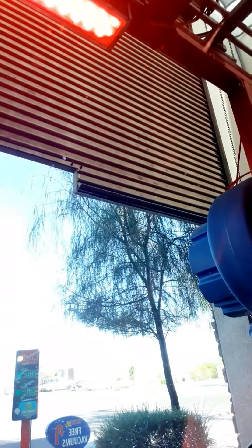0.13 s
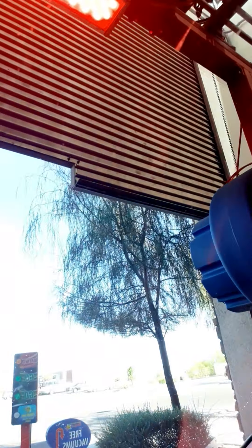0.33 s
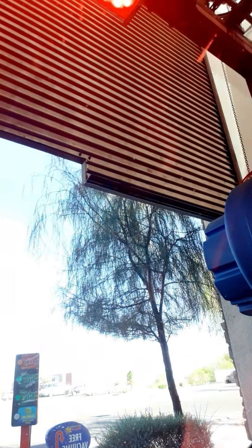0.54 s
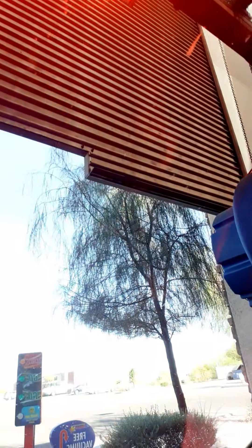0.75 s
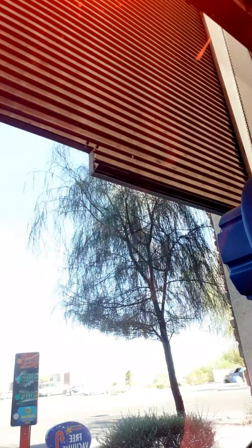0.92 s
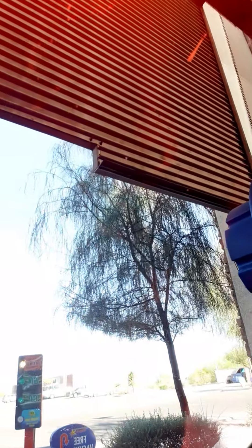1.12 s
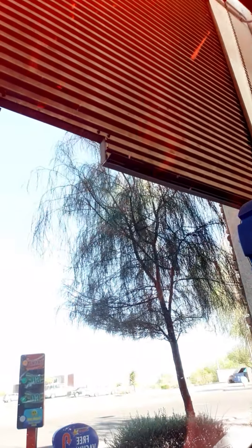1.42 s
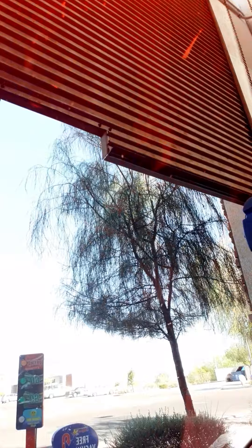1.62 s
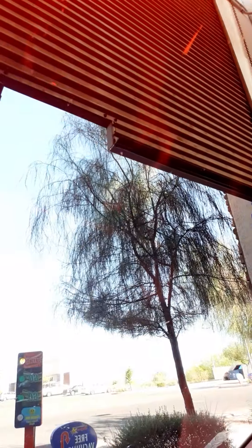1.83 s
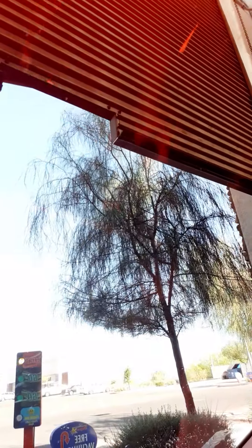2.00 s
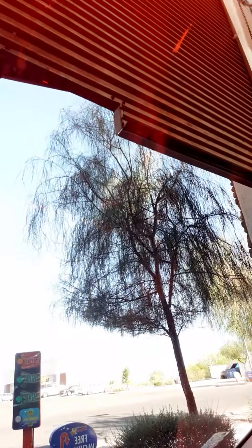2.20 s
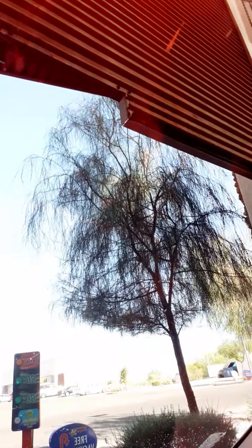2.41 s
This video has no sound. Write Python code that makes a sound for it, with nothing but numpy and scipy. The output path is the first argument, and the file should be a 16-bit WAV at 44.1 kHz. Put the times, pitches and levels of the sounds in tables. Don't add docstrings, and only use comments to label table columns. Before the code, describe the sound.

Powerful drying blowers roar over a car leaving a wash tunnel, heard inside the closed cabin on a phone microphone: deep uneven booming, dulled air rush slowly fading, faint fan whine, two tiny ticks.

```python
import sys
import numpy as np
from scipy import signal
from scipy.fft import rfft, irfft, next_fast_len
from scipy.io import wavfile
from scipy.ndimage import uniform_filter1d

SR = 44100
rng = np.random.default_rng(int(sys.argv[2]) if len(sys.argv) > 2 else 0)


def how_loud(loudness_db):
    steps = np.asarray(loudness_db, float) / 20
    return 10 ** steps


def store_wav(level_fs):
    pcm = np.round(np.clip(np.atleast_2d(level_fs), -1, 1) * 32767)
    wavfile.write(sys.argv[1], SR, pcm.T.astype(np.int16))


N = 112454
PAD = 4096


def rms_one(x):
    return x / np.sqrt(np.mean(x ** 2) + 1e-20)


def in_time(rows):
    return np.interp(np.arange(N) / SR, *np.transpose(rows))


def swing_of(rows):
    level = in_time(rows)
    return level - level.mean()


def at_hz(points, hz):
    f, value = np.transpose(points)
    return np.interp(np.log(hz), np.log(f), value)


def bumps(peaks, hz):
    return sum(db / (1 + (2 * (hz - f) / width) ** 2) for f, width, db in peaks)


def fft_hz(size):
    return np.maximum(np.fft.rfftfreq(size, 1 / SR), 1)


def drift(rate_hz):
    pole = np.exp(-80 * np.pi * rate_hz / SR)
    noise = rng.standard_normal(N // 40 + 2002)
    slow = signal.lfilter([1], [1, -2 * pole, pole * pole], noise)[2000:]
    return np.interp(np.arange(N) / 40, np.arange(len(slow)), rms_one(slow - slow.mean()))


# frequency in Hz, likeness from 0 to 1.
LIKENESS = [(60, 1), (160, 1), (270, 0.81), (410, 0.76), (620, 0.4), (1000, 0.26), (1500, 0.22),
            (2600, 0.056)]
# frequency in Hz, lead in radians.
LEFT_LEAD = [(55, .02), (200, 0.21), (410, 0.64), (560, 1.17), (720, 0.33), (900, 2.25), (1300, 3.75),
             (2000, 4.1)]


def stereo(shape):
    size = next_fast_len(N + PAD)
    hz = fft_hz(size)
    common, left, right = rfft(rng.standard_normal((3, size)))
    alike = np.clip(at_hz(LIKENESS, hz), 0, 1)
    early = np.exp(1j * at_hz(LEFT_LEAD, hz))
    shared = np.sqrt(alike) * common * [early, np.ones_like(early)]
    own = np.sqrt(1 - alike) * np.array([left, right])
    return hz, size, (shared + own) * shape(hz)


def steadied(band):
    window_s, share = 0.2, 0.8
    slow = uniform_filter1d(np.mean(band ** 2, axis=0), int(window_s * SR), mode="reflect")
    return band * (np.mean(slow) / (slow + 1e-30)) ** (share / 2)


def banded(shape, low_hz, high_hz, follow, shared_db, own_db, own_rate):
    hz, size, pair = stereo(shape)
    together, out = drift(4.4), 0
    for centre in np.arange(np.log2(low_hz), np.log2(high_hz), 0.5):
        window = np.cos(np.pi * np.clip(np.log2(hz) - centre, -0.5, 0.5)) ** 2
        band = steadied(irfft(pair * window, size)[:, :N])
        flicker_db = shared_db * together + own_db * drift(own_rate)
        out = out + band * how_loud(follow(2 ** centre) + flicker_db)
    return rms_one(out)


def tones(rows, swell_db, flutter_db):
    out = 0
    for f, wander, db in rows:
        pitch_hz = f + wander * drift(3.87)
        phase = 2 * np.pi * (np.cumsum(pitch_hz) / SR + rng.random())
        lead = np.array([[at_hz(LEFT_LEAD, f)], [0]])
        level_db = db + 3.5 + swell_db + flutter_db * drift(7.0)
        out = out + how_loud(level_db) * np.sin(phase + lead)
    return out


# time in seconds, force in dB.
ROOF_FORCE = [(0, -14.5), (.2, -17.5), (.36, -11.5), (.52, -18), (.68, -13), (.82, -13), (.92, -19),
              (1.15, -17.5), (1.28, -13.5), (1.42, -17.5), (1.57, -16), (1.72, -16), (1.88, -19),
              (2.05, -19), (2.2, -18), (2.35, -13), (2.55, -14.5)]
# time in seconds, force in dB.
DOOR_FORCE = [(0, -13.5), (.2, -13.5), (.37, -17), (.5, -11.5), (.68, -11.5), (.82, -13), (.97, -12.5),
              (1.12, -16), (1.3, -16), (1.45, -8), (1.58, -14), (1.8, -17), (2.05, -16), (2.2, -13),
              (2.35, -17.5), (2.55, -15.5)]
# time in seconds, force in dB.
BODY_ROCKING = [(0, 1.5), (.15, -2), (.4, -2.5), (.52, 3.5), (.65, -1.5), (.85, -3.5), (1.1, 0), (1.3, 2),
                (1.43, 2.5), (1.58, -3.5), (1.75, 2.5), (1.87, -1.5), (2.0, 3), (2.2, -2), (2.35, -1.5),
                (2.46, 3), (2.55, 0.5)]


def forces():
    return swing_of(ROOF_FORCE), swing_of(DOOR_FORCE), swing_of(BODY_ROCKING)


# frequency in Hz, level in dB per Hz.
BOOM_COLOUR = [(13, -48), (22, -40), (44, -16), (129, -0.5), (172, -3), (209, -5), (307, -10), (396, -11.5),
               (650, -21.5), (840, -58.5), (1430, -120)]
# frequency in Hz, width in Hz, height in dB.
CABIN_MODES = [(57, 14.4, 7), (81, 27, 5), (133, 30, 5), (167.4, 14.6, 5), (197.7, 13, 2.5), (268.3, 40, 2),
               (377.5, 18, 2.5), (310, 41, 0), (551, 38, 2.5), (99.8, 5.7, -4.5), (145.5, 7.5, -9.5),
               (640, 75, -9.5), (736, 55, -4)]


def boom():
    roof, doors, body = forces()

    def shape(hz):
        return how_loud(at_hz(BOOM_COLOUR, hz) + bumps(CABIN_MODES, hz)) / (1 + (hz / 700) ** 8)

    def near(hz, centre_hz, octaves):
        return 1 / (1 + (np.log2(hz / centre_hz) / octaves) ** 2)

    def follow(hz):
        return roof * near(hz, 122, 0.56) + doors * near(hz, 178, 0.63) + body * near(hz, 58, 0.55)

    return how_loud(-13.5) * banded(shape, 15.7, 1500, follow, shared_db=0.43, own_db=0.2, own_rate=3.2)


# pitch in Hz, wander in Hz, level in dB rms.
DRUMMING = [
    (126.77, 3.99, -23.5),
    (161.3, 5, -23.5),
    (58.15, 3.94, -30.5),
    (81.5, 3.99, -29.5),
]


def panels():
    roof, doors, body = forces()
    roof_hum = tones(DRUMMING[:1], roof, flutter_db=0.0)
    door_hum = tones(DRUMMING[1:2], doors, flutter_db=2.0)
    floor_hum = tones(DRUMMING[2:], body, flutter_db=0.0)
    return roof_hum + door_hum + floor_hum


# time in seconds, level in dB.
NEARNESS = [(0.0, -41), (.08, -41.5), (0.55, -42), (0.73, -42.5), (.8, -44.5), (1.03, -43), (1.3, -44),
            (1.65, -44), (1.85, -44.6), (2.33, -45), (2.55, -45)]
# frequency in Hz, level in dB per Hz.
RUSH_COLOUR = [(260, -36), (450, 3), (702, -4.5), (802, -11.5), (1150, -16), (1310, -21), (7530, -44),
               (9000, -46), (15600, -51.5)]
# frequency in Hz, width in Hz, height in dB.
GLASS = [(2110, 1000, 1), (1292, 76, -5.5), (3080, 440, -1), (4060, 350, -0.5), (15000, 3000, -2.5)]


def rush():
    whole_over_treble_db = 11
    recede_tilt = 0.16
    swing = swing_of(NEARNESS)

    def shape(hz):
        return how_loud(at_hz(RUSH_COLOUR, hz) + bumps(GLASS, hz)) / (1 + (650 / hz) ** 8)

    def follow(hz):
        return swing * (1.24 + recede_tilt * np.log2(hz / 1500))

    level = how_loud(in_time(NEARNESS).mean() + whole_over_treble_db)
    return level * banded(shape, 256, 22000, follow, shared_db=0.5, own_db=0.5, own_rate=6.6)


# pitch in Hz, wander in Hz, level in dB rms.
BLADES = [(715, 2.56, -43.5), (1434, 12, -52), (1917, 6.2, -63)]
# time in seconds, level in dB.
WHINE = [(0, -15), (.5, 0), (.8, -10), (1.0, 4.5), (1.13, 1.5), (1.18, -4), (1.23, 2), (1.35, -7),
         (1.47, 1.5), (1.58, -5.5), (1.69, 7), (1.8, -3), (1.95, 0), (2.2, -1), (2.33, 0), (2.55, -9.5)]


def blades():
    return tones(BLADES, in_time(WHINE), flutter_db=1.5)


def ping(t, delay, db, hz, t60):
    late = np.maximum(t - delay, 0)
    return how_loud(db - 60 * late / t60) * np.sin(2 * np.pi * hz * late)


# start in seconds, peak level in dB.
TICKS = [
    (0.1042, -30),
    (0.8319, -30.5),
]
# frequency in Hz, level in dB per Hz.
TICK_COLOUR = [(1500, -8), (2500, 2), (4200, -1), (5800, 0), (9000, -9), (12000, -10), (15500, -15)]
TICK_DIRECT_DB = [4, -11]
# frequency in Hz, time to fall 60 dB in seconds.
TICK_CRACK = [(10500, .0015), (14800, .004)]
# delay in seconds, level in dB, pitch in Hz, 60 dB fall in seconds.
TICK_RING = [(.0013, -14, 8800, .016), (.0020, -8, 3400, .04), (.0055, -15, 9000, .02)]
# delay in seconds, level in dB, pitch in Hz, 60 dB fall in seconds.
TICK_ECHO = [(.0008, -9, 4800, .006), (.0028, 3, 4150, 0.0035), (.0030, -8, 7700, .003),
             (.0043, -8, 4900, 0.012)]


def ticks():
    rise_s, t60_s, tail_db = 0.0008, 0.065, -6.5
    t = np.arange(PAD) / SR
    colour = how_loud(at_hz(TICK_COLOUR, fft_hz(PAD)))
    out = np.zeros((2, N))
    for s, db in TICKS:
        noise = rms_one(irfft(rfft(rng.standard_normal((2, PAD))) * colour, PAD))
        direct = how_loud(np.array(TICK_DIRECT_DB)[:, None])
        crack = direct * np.array([ping(t, 0, 0, *row) for row in TICK_CRACK])
        left_ring = sum(ping(t, *row) for row in TICK_RING)
        right_echo = sum(ping(t, *row) for row in TICK_ECHO)
        swell = 1 - np.exp(-(t / rise_s) ** 2)
        tail = how_loud(tail_db - 60 * t / t60_s) * swell * noise
        start = int(s * SR)
        out[:, start:start + PAD] += how_loud(db) * (crack + np.array([left_ring, right_echo]) + tail)
    return out


def scene():
    return boom() + panels() + rush() + blades() + ticks()


def band_limit(x):
    return signal.sosfilt(signal.butter(12, 15730, fs=SR, output="sos"), x)


# frequency in Hz, left over right in dB.
LEAN = [(60, 1.2), (120, 3), (190, 1.3), (370, 4.5), (520, 2.5), (670, 5.5), (860, 0.5), (5000, 1)]
# frequency in Hz, width in Hz, height in dB.
PORTS = [
    [(1320, 310, 2.5), (7760, 900, -5.5), (8860, 940, 7), (11500, 4000, 1)],
    [(4040, 490, 5), (7240, 750, -3.5), (8285, 1200, 3)],
]


def record(dry):
    ceiling, ease_s = 2.14, 0.003
    run_in = np.pad(dry, [(0, 0), (PAD, PAD)], mode="reflect", reflect_type="odd")
    size = next_fast_len(N + 3 * PAD)
    hz = fft_hz(size)
    lean = at_hz(LEAN, hz) / 2
    colour = how_loud([bumps(PORTS[0], hz) + lean, bumps(PORTS[1], hz) - lean])
    x = irfft(rfft(run_in, size) * colour, size)[:, PAD:PAD + N]
    held = ceiling * np.tanh(x / ceiling)
    to_end_s = np.minimum(np.arange(N), np.arange(N)[::-1]) / SR
    ease = np.sin(np.pi / 2 * np.minimum(to_end_s / ease_s, 1)) ** 2
    return band_limit(ease * held)


dry = scene()
out = record(dry)
store_wav(out)
```